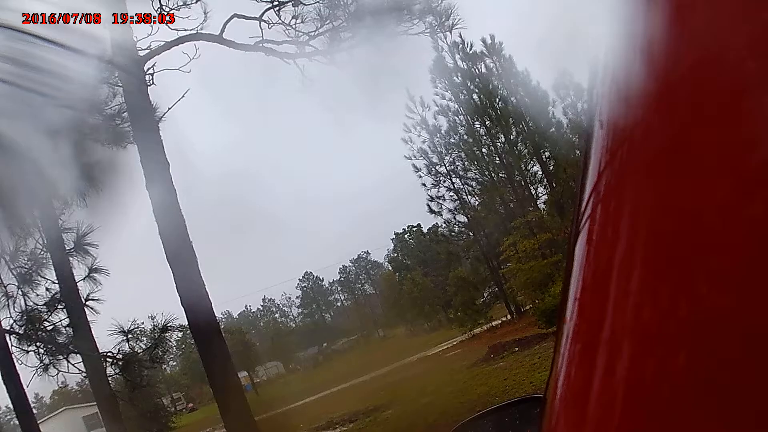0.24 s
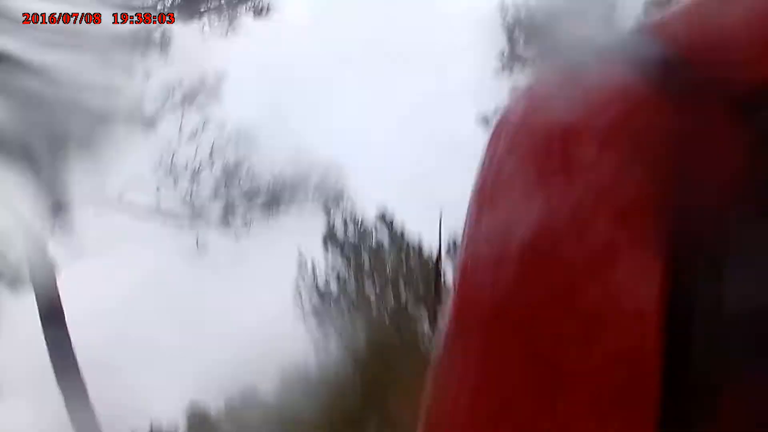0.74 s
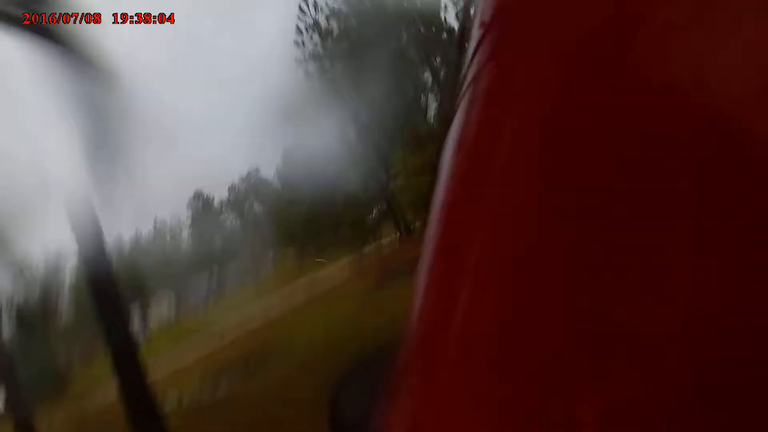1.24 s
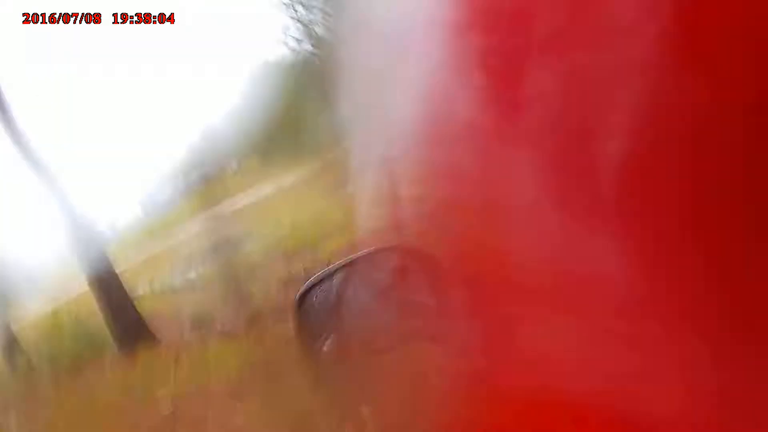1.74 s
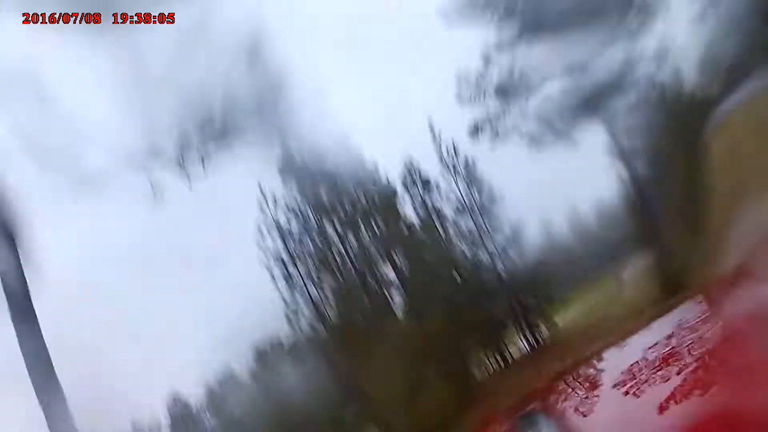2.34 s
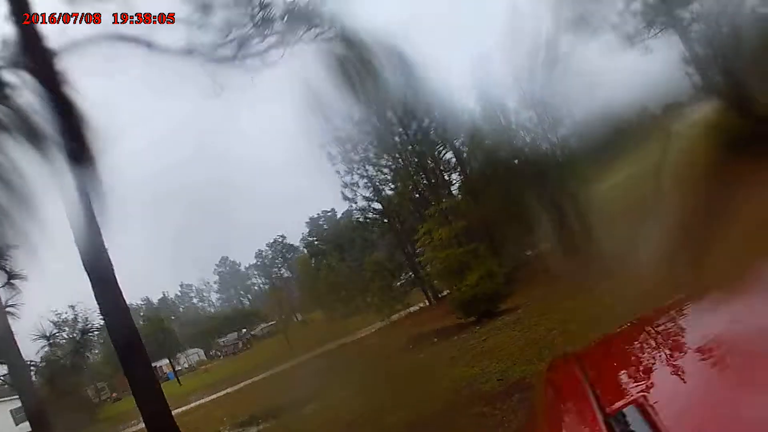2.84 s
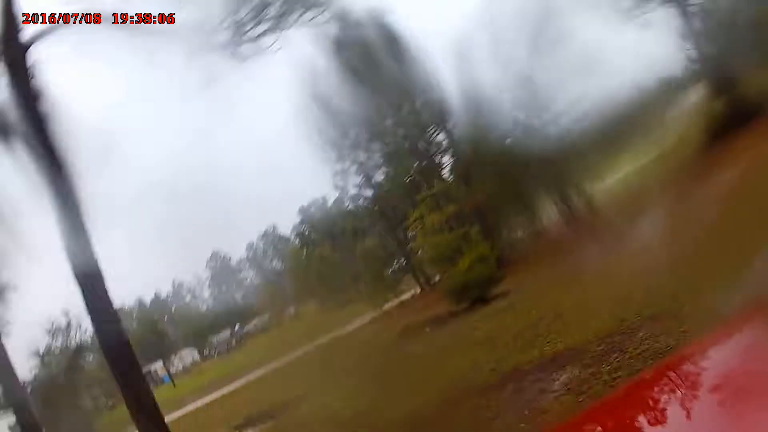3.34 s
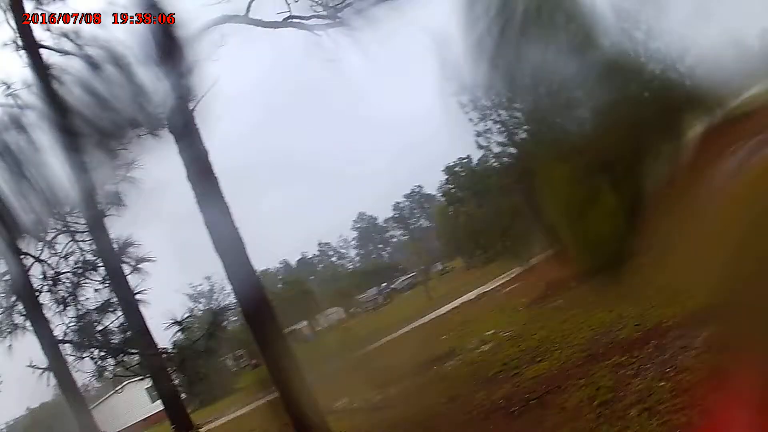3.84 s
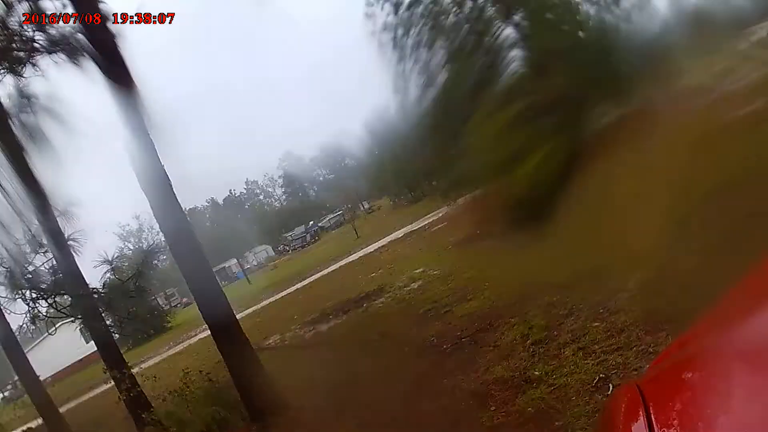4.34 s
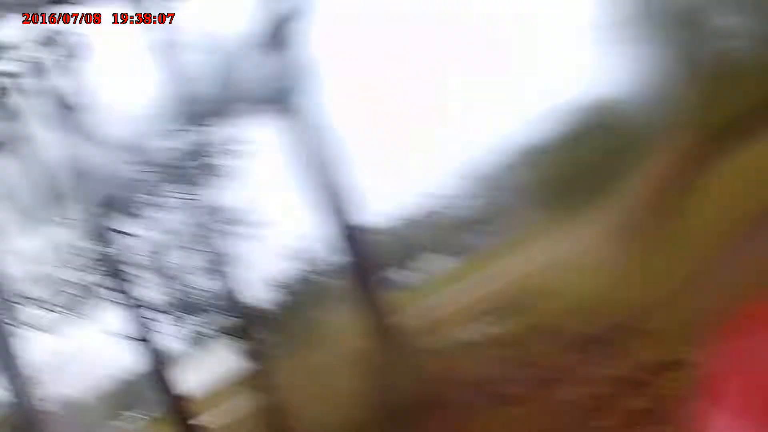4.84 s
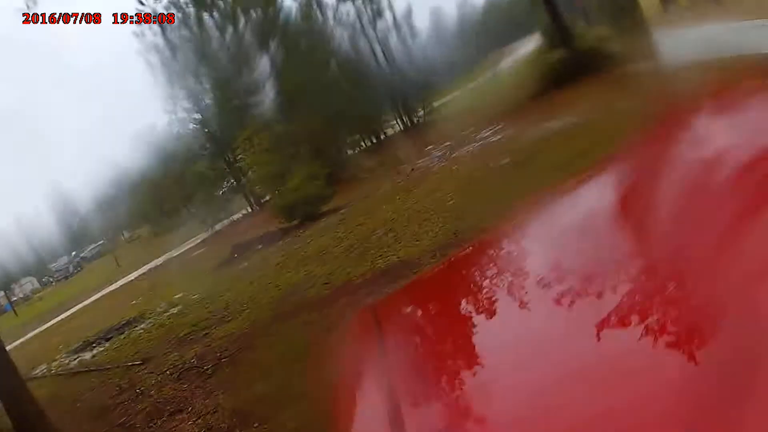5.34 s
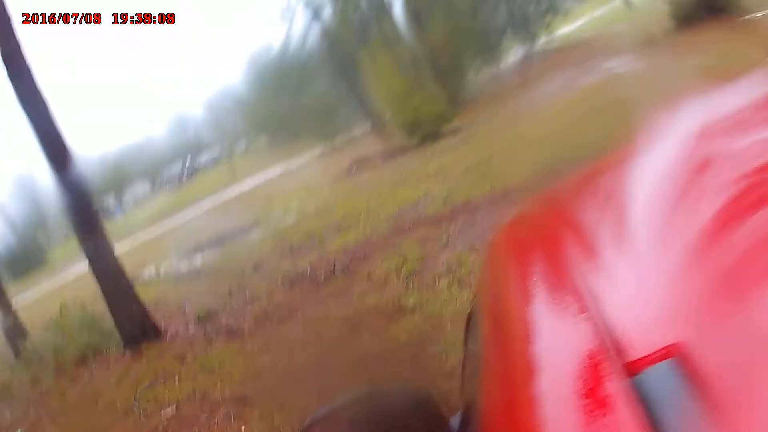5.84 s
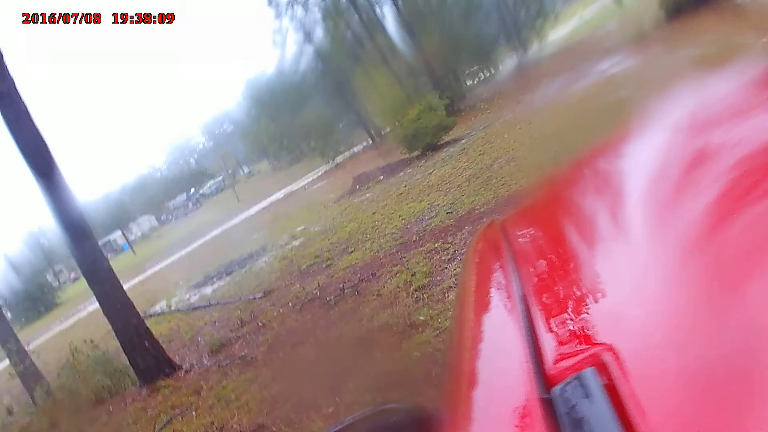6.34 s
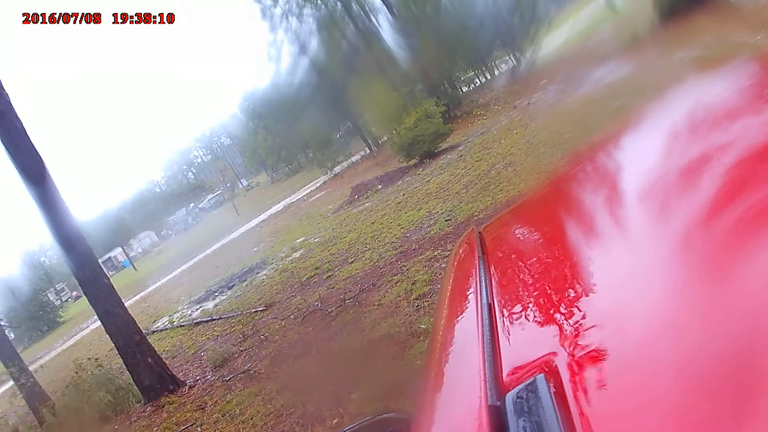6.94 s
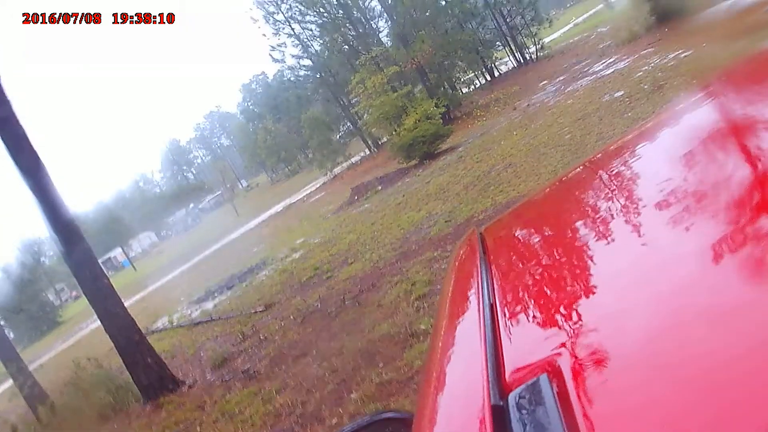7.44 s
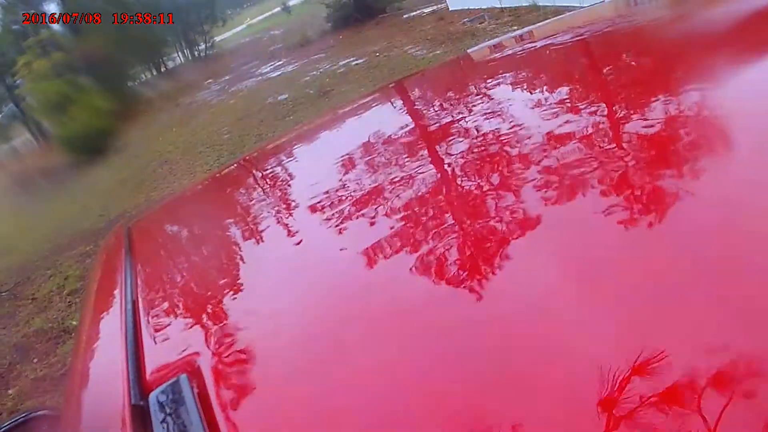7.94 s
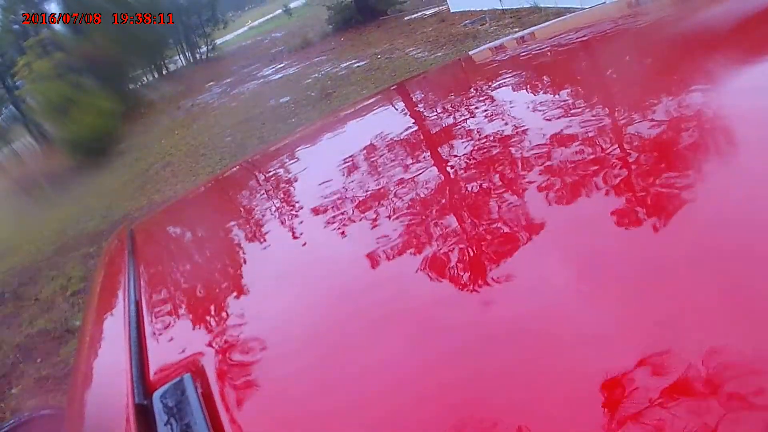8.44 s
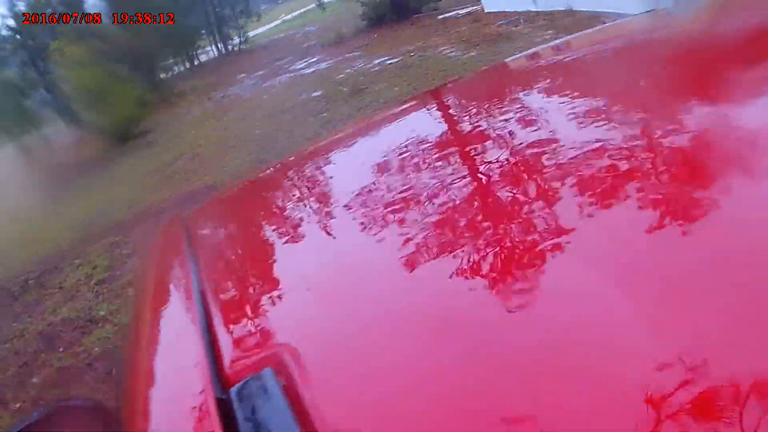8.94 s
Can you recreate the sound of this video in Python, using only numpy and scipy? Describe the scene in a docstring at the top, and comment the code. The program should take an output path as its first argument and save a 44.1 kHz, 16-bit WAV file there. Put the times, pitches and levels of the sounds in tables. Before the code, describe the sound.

Storm wind and spray batter a small cased microphone beside a pickup, with honking buffets, hard knocks and crackle, then a hollow sheltered hum with drops.

```python
"""Beside a pickup truck in a hurricane, wind and rain beat on a small cased camera.
Gusts and spray are fluttering noise shaped into a rush; buffets honk through the case near 1.4 kHz.
Drops tick as short resonances, and knocks and jolts add scraping, crackle, thumps and a ringing mount.
Later the truck shelters the camera: a hollow hum under a light patter. Microphone hiss lies under it
all; the loudest peaks overload."""
import sys
import numpy as np
from scipy import signal
from scipy.fft import rfft, irfft
from scipy.io import wavfile
from scipy.ndimage import uniform_filter1d

SR = 44100
rng = np.random.default_rng(int(sys.argv[2]) if len(sys.argv) > 2 else 0)


def master(y):
    """Save y as 16-bit WAV."""
    cut = np.clip(np.atleast_2d(y).T, -1, 1)
    pcm = np.round(cut * 32767)  # scale
    wavfile.write(sys.argv[1], SR, pcm.astype(np.int16))


N = 404838
TIME = np.arange(N) / SR

# drops and debris hitting the case: t/s, peak/dB, f/Hz, treble re middle before trim/dB
TICKS = [(0.162, -28.5, 1640, -14), (0.229, -25, 1660, -6), (0.615, -28, 1590, -11),
         (0.729, -20.5, 1360, -15.5), (1.625, -36, 1370, -42), (2.355, -21, 1380, -24),
         (2.476, -15.5, 1310, -25), (3.345, -14.5, 1410, -21), (3.986, -21, 1380, -23.5),
         (4.031, -25.5, 1430, -38), (4.143, -21, 1380, -5), (4.251, -12.5, 1393, -20),
         (4.36, -24, 1290, -13), (4.63, -29, 1380, -20), (4.594, -27.5, 1340, -29),
         (4.733, -29.5, 1380, -17), (4.807, -13.5, 1360, -48), (5.137, -1.5, 1346, -31.5),
         (5.321, -22, 1210, -26), (5.455, -21.5, 1420, -28), (5.545, -13.5, 1400, -45),
         (5.681, -25.5, 1410, -25), (5.78, -25.5, 1540, -31), (5.988, -18, 1354, -27.5),
         (6.155, -3.5, 1310, -42), (6.447, -23, 1600, -43), (6.632, -20, 1540, -42),
         (6.938, -24, 1300, -33), (7.153, -11.5, 1330, -16.5), (7.262, -22, 1500, -29),
         (7.51, -20.5, 1400, -18), (7.533, -19.5, 1380, -19), (7.685, -7, 1466, -24.5),
         (7.815, -21.5, 1306, -32), (7.901, -6, 1307, -13), (7.932, -18.5, 1380, -17),
         (7.959, -22, 1390, -19), (8.444, -23.5, 1390, -18)]
# camera bumps and chatters, levels before trims: t/s, contact/s, level/dB, thud/dB,
# treble re level/dB, mount ring/dB
KNOCKS = [(0.771, 0.0064, -19, -47, -25, -68), (0.818, 0.0023, -6.5, -38.5, -19.5, -65),
          (0.849, 0.016, -12, -25, -16, -31.5), (0.984, 0.0056, -11.5, -30, -24.5, -106),
          (1.139, 0.011, -9.5, -35.5, -36, -41), (1.363, 0.0043, -12, -50, -37, -50),
          (1.692, 0.021, -13, -18.5, -11, -53), (1.718, 0.027, -10, -21, -16, -59),
          (1.77, 0.0076, -4.5, -19, -23, -75), (1.784, 0.0044, -10.5, -27, -20, -67),
          (1.944, 0.013, -7, -21.5, -26, -49), (2.117, 0.0094, -4.5, -22, -38, -34.5),
          (2.211, 0.01, -10, -20.5, -16.5, -33), (2.269, 0.011, -13, -19, -10.5, -56),
          (2.407, 0.011, -10, -25.5, -17, -34.5), (2.501, 0.0049, -24.5, -34.5, -15.5, -72),
          (2.721, 0.0031, -13, -31, -37, -47.5), (3.149, 0.006, -5, -20.5, -22, -34.5),
          (3.706, 0.0084, -28.5, -64, -21, -40), (4.946, 0.012, -26, -67, -22, -90),
          (5.004, 0.011, -20.5, -59, -27, -65), (6.238, 0.0075, -25.5, -68, -32, -59)]
# steady wind in the lee of the truck: t/s, level before trim/dB
LEE = [(6.2, -42), (6.33, -45), (6.48, -40.5), (6.59, -40.5), (6.91, -45.5), (7.54, -41), (7.72, -44),
       (7.93, -43), (8.48, -46), (9.18, -42)]
# spectrum of wind and spray: f/Hz, level/dB
RUSH_COLOUR = [(210, -64.5), (350, -36), (564, -24), (834, -11.5), (1010, -12), (1500, 0), (2140, -7.5),
               (2410, -15.5), (2730, -14), (3050, -23.5), (3280, -19), (3660, -31), (4500, -28),
               (6110, -55), (6500, -51.5), (8450, -105), (14300, -120)]
# spectrum of rumbles and thuds: f/Hz, level/dB
RUMBLE_COLOUR = [(15, -6.5), (50, -3), (130, -3), (350, -4), (600, -4), (1200, -1), (3000, -53.5)]
# spectrum of snaps and patter: f/Hz, level/dB
SNAP_COLOUR = [(100, -24), (600, -23.5), (1500, -5), (2200, 10), (2700, 2.5), (3500, -4.5), (4500, -10),
               (5300, -22), (6200, -38.5), (9000, -29)]
# spectrum of crackle and sizzle: f/Hz, level/dB
CRACKLE_COLOUR = [(2000, -3.5), (4500, -9.5), (6000, -27), (7200, -19.5), (8000, -33.5), (9000, -16),
                  (11500, -4), (17000, -10.5)]

# shared by gusts and lee eddies
GUST_RISE_DB_PER_S, GUST_FALL_DB_PER_S, GUST_ARCH_DB = 796.5, 492.5, 3.5


def from_db(db):
    """Decibels to gain."""
    return 10 ** (np.asarray(db) / 20)


def rms_one(x):
    """Scale to rms 1."""
    return x / np.sqrt(np.mean(x ** 2) + 1e-20)


def peak_one(x):
    """Scale to a peak of 1."""
    return x / np.abs(x).max()


def add(out, s, sound):
    """Mix a sound in at time s."""
    start = max(round(s * SR), 0)
    out[start:start + len(sound)] += sound[:N - start]


def drift(rate_hz):
    """Slow random wander of rms 1: noise through two equal poles at rate_hz."""
    step, settle = 20, 2000  # samples per slow point, slow points discarded
    r = np.exp(-2 * np.pi * rate_hz * step / SR)
    noise = rng.standard_normal(N // step + settle + 2)
    slow = signal.lfilter([1], [1, -2 * r, r * r], noise)[settle:]
    return np.interp(np.arange(N) / step, np.arange(len(slow)), rms_one(slow))


def colour(x, spectrum, size=2048):
    """Causal (minimum-phase) filter with the given spectrum; white noise keeps its power."""
    hz, db = np.transpose(spectrum)
    grid_hz = np.maximum(np.arange(size // 2 + 1) * SR / size, 1)
    level_db = np.interp(np.log(grid_hz), np.log(hz), db)
    cepstrum = irfft(np.log(from_db(level_db)))
    # fold onto the causal half
    cepstrum[1:size // 2] *= 2
    cepstrum[size // 2 + 1:] = 0
    response = irfft(np.exp(rfft(cepstrum)))
    return signal.oaconvolve(x, response / np.linalg.norm(response))[:len(x)]


def treble(x, edge_hz=3500):
    """The hissing top of a sound, by zero-phase high-pass."""
    return signal.sosfiltfilt(signal.butter(4, edge_hz, "high", fs=SR, output="sos"), x)


def ring(x, hz, t60_s):
    """Two-pole resonator: a unit click sets a sine of height 1 ringing."""
    r, w = from_db(-60 / (t60_s * SR)), 2 * np.pi * hz / SR
    return signal.lfilter([0, np.sin(w)], [1, -2 * r * np.cos(w), r * r], x + 1e-18)


def mount(kicks):
    """Kicks set the modes of the springy camera mount ringing."""
    # modes: f/Hz, level/dB, t60/s
    modes = [(228.7, -1, 0.53), (240, -18, 0.18), (312, -8.5, 0.055)]
    return sum(from_db(db) * ring(kicks, hz, t60_s) for hz, db, t60_s in modes)


def blast(s, length_s, rise_db_per_s, fall_db_per_s, arch_db):
    """Gain of one blast of air: quick rise, arched hold, quick fall and a weak lingering wake."""
    wake_db, wake_fall_db_per_s = -16, 138
    early_s = np.maximum(s - TIME, 0)
    late_s = np.maximum(TIME - s - length_s, 0)
    arch = arch_db * np.clip(2 * (TIME - s) / length_s - 1, -1, 1) ** 2
    fall = np.maximum(-fall_db_per_s * late_s, wake_db - wake_fall_db_per_s * late_s)
    return from_db(np.maximum(fall - arch - rise_db_per_s * early_s, -150))


def spray(per_s, spread_db, drops_db, flutter_db, flutter_hz):
    """Turbulent air that flutters, with fine drops of uneven size in it; rms 1."""
    sizes = from_db(spread_db * np.minimum(rng.exponential(1, N), 4)) * rng.choice([-1, 1], N)
    drops = rms_one(sizes * (rng.random(N) < per_s / SR))
    air = rng.standard_normal(N)
    return rms_one((air + from_db(drops_db) * drops) * from_db(flutter_db * drift(flutter_hz)))


def sheltered(fade_s=0.038):
    """0 in the open, 1 once the camera is in the lee of the truck."""
    return np.clip((TIME - LEE[0][0]) / fade_s + 1, 0, 1)


def rush(open_wind_db=-49, rumble_trim_db=3.5, mount_db=-37, open_rumble_db=-28):
    """Sheets of wind and spray: a broad roar with rumble below it; the mount hums along."""
    # gusts: t/s, length/s, level/dB, treble lift/dB, rumble re level before trim/dB
    gusts = [(2.421, 0.098, -33, -7, -17), (2.623, 0.036, -35.5, -6, -15.5), (2.704, 0.42, -23, 4, -31.5),
             (3.05, 0.048, -20, 3, -32), (3.16, .14, -19, 0, -38), (3.405, 0.18, -18.5, 3, -38),
             (3.592, 0.11, -25, 2, -37), (3.681, .10, -17.5, 2.5, -40), (3.79, 0.099, -28.5, 2, -28.5),
             (4.03, 0.074, -42, -5, -23), (4.354, 0.058, -38, -4, -21.5), (4.793, 0.13, -30, -14, -26),
             (5.182, 0.26, -39, 3, -22.5), (5.463, 0.057, -24, 3.5, -27), (5.543, 0.069, -33, 1, -28),
             (5.977, 0.02, -33.5, -10, -17), (6.095, 0.023, -31.5, -1, -19)]
    force = from_db(open_wind_db) * (1 - sheltered())
    treble_boost, shaking = 0, from_db(open_rumble_db) * force
    for s, length_s, level_db, lift_db, low_db in gusts:
        shape = blast(s, length_s, GUST_RISE_DB_PER_S, GUST_FALL_DB_PER_S, GUST_ARCH_DB)
        gust = from_db(level_db) * shape
        treble_boost = np.where(gust > force, from_db(lift_db) - 1, treble_boost)
        force = np.hypot(force, gust)
        shaking = np.hypot(shaking, from_db(low_db) * gust)
    flow = force * spray(per_s=350, spread_db=3.0, drops_db=-4, flutter_db=2.0, flutter_hz=23)
    roar = colour(flow, RUSH_COLOUR)
    roar = roar + uniform_filter1d(treble_boost, size=512) * treble(roar)
    rumble = colour(shaking * rng.standard_normal(N), RUMBLE_COLOUR)
    hum = rms_one(mount(flow)) * flow.std()
    return roar + from_db(rumble_trim_db) * rumble + from_db(mount_db) * hum


def drizzle(per_s=8.7, level_db=-34.5, spread_db=4, snap_db=-6.0, ring_db=-6.5, cavity_hz=1380, t60_s=.014):
    """Faint drops tap the case at random: each is a brief snap and a ring of the cavity."""
    sizes = from_db(level_db + spread_db * rng.uniform(-1, 1, N))
    taps = (rng.random(N) < per_s / SR) * sizes
    push = np.diff(taps, prepend=0) * SR / (2 * np.pi * cavity_hz)
    cavity = ring(push, cavity_hz, t60_s)
    return from_db(ring_db) * cavity + from_db(snap_db) * colour(taps, SNAP_COLOUR)


def splashes(trim_db=-3.5, bright_db=-4.5, rise_s=0.0011, size=12000):
    """Handfuls of spray slap the case within milliseconds and drain away: enveloped spray noise."""
    # slaps: t/s, level before trim/dB, decay/s
    slaps = [(0.041, -30, 0.05), (0.23, -24, 0.027), (0.293, -26.5, 0.026), (0.516, -25, 0.048),
             (0.567, -25.5, 0.0091), (0.631, -31.5, 0.036), (4.841, -14, 0.0054), (5.454, -22.5, 0.029),
             (6.514, -28, 0.011), (6.632, -26.5, 0.013), (6.934, -18.5, 0.011), (7.361, -27, 0.016)]
    wet, t = np.zeros(N), np.arange(size) / SR
    for s, level_db, decay_s in slaps:
        add(wet, s, from_db(level_db + trim_db) * (1 - np.exp(-t / rise_s)) * np.exp(-t / decay_s))
    flow = wet * spray(per_s=900, spread_db=3, drops_db=-4, flutter_db=1.5, flutter_hz=80)
    return colour(flow, RUSH_COLOUR) + from_db(bright_db) * colour(flow, SNAP_COLOUR)


def ticks(snap_trim_db=16.5, splash_s=0.002, thud_db=-29, size=4096):
    """A hit swells into the cavity resonance; its splash adds a short snap, its push a slight thud."""
    out, t = np.zeros(N), np.arange(size) / SR
    swell_t60_s, case_t60_s = .003, .019
    click = 1.0 * (t == 0)
    thud = colour(click, RUMBLE_COLOUR)
    for s, peak_db, hz, treble_db in TICKS:
        cavity = ring(click, hz, case_t60_s)
        honk = ring(np.diff(cavity, prepend=0), hz, swell_t60_s)
        snap = colour(rng.standard_normal(size) * np.exp(-t / splash_s), SNAP_COLOUR)
        hit = peak_one(honk) + from_db(treble_db + snap_trim_db) * peak_one(snap)
        hit = hit + from_db(thud_db) * peak_one(thud)
        add(out, s, from_db(peak_db) * peak_one(hit))
    return out


def all_jolts():
    """Jolts from wind, knocks and drops, before trims: rows of (t/s, crackle/dB, thump/dB)."""
    # the wind alone jolts the camera inside its case: t/s, crackle peak/dB, thump/dB
    wind_jolts = [(0.5895, -38.5, -43.5), (0.875, -22, -35), (1.1115, -23.5, -35.5), (1.2622, -29.5, -43),
                  (1.3499, -27.5, -39), (1.5314, -31.5, -43.5), (1.7406, -13.5, -36), (1.8203, -29, -31.5),
                  (2.177, -27, -36), (2.2397, -22, -33), (2.2992, -22.5, -32), (2.359, -17.5, -34),
                  (2.638, -26, -45), (2.9888, -29, -42.5), (3.1018, -25, -37), (3.1256, -22.5, -45),
                  (3.162, -20, -26.5), (3.2297, -17.5, -38.5), (3.3575, -24.5, -41), (3.512, -25, -36),
                  (3.636, -32, -46), (5.68, -25, -39), (5.8609, -34, -50), (5.9902, -37, -42)]
    # intercept in dB at 0 dB thud or peak; growth in dB per dB
    knock_crackle_db, knock_crackle_growth = 1.5, 0.67
    knock_thump_db, knock_thump_growth = -19.5, 0.54
    tick_crackle_db, tick_crackle_growth = -21.5, 1.52
    tick_thump_db = -50  # re drop peak
    knocked = [(s, knock_crackle_db + knock_crackle_growth * thud_db,
                knock_thump_db + knock_thump_growth * thud_db)
               for s, _, _, thud_db, _, _ in KNOCKS]
    ticked = [(s, tick_crackle_db + tick_crackle_growth * peak_db, peak_db + tick_thump_db)
              for s, peak_db, _, _ in TICKS]
    return wind_jolts + knocked + ticked


def jolts(crackle_trim_db=1.5, thump_trim_db=-1.5, mount_db=-19, size=6000):
    """Loose play in the case: a thin uneven crackle over a soft low thump, which nudges the mount."""
    thump_hz, thump_s, rattle_s, uneven_db = 88, 0.0096, 0.01, 11.0
    out, kicks, t = np.zeros(N), np.zeros(N), np.arange(size) / SR
    swell = np.sqrt(t) * np.exp(-(t / rattle_s) ** 2)
    for s, peak_db, low_db in all_jolts():
        # a new random level every 60 samples
        slips = from_db(uneven_db * np.repeat(rng.standard_normal(size), 60)[:size])
        crackle = colour(rng.standard_normal(size) * slips * swell, CRACKLE_COLOUR)
        hz = thump_hz * rng.uniform(0.67, 1.32)
        thump = t / thump_s * np.exp(1 - t / thump_s) * np.sin(2 * np.pi * hz * t)
        add(out, s, from_db(peak_db + crackle_trim_db) * peak_one(crackle)
            + from_db(low_db + thump_trim_db) * thump)
        add(kicks, s, from_db([low_db + mount_db]) * rng.choice([-1, 1]))
    return out + mount(kicks)


def buffets(rumble_db=-29):
    """Short lumpy blasts straight onto the case blow its cavity: fluttering noise with a honk."""
    # blasts: t/s, length/s, level/dB, treble lift/dB
    blasts = [(0.768, 0.024, -16, -1), (0.813, 0.068, -14.5, -0.5), (0.977, .048, -21, -2),
              (1.103, 0.051, -19, 1), (1.239, 0.18, -16, -0.5), (1.489, 0.01, -19.5, 0),
              (1.539, 0.011, -26, -2), (1.643, 0.026, -13.5, 0.5), (1.68, 0.11, -12, 1.5),
              (1.809, 0.047, -31, 2), (1.9, 0.14, -14, 5), (2.061, 0.13, -26.5, 9), (2.21, 0.032, -17.5, 1),
              (2.263, 0.037, -16.5, 1), (2.352, 0.017, -33, -4)]
    # honk spectrum: f/Hz, level/dB
    honk_colour = [(210, -67.5), (350, -45.5), (711, -14), (794, -9), (1040, -12.5), (1190, -3), (1360, 4),
                   (1690, -6.5), (1890, -12.5), (2220, -11), (2700, -16), (3050, -27), (4560, -31.5),
                   (5890, -53), (6500, -52), (8450, -101), (14300, -120)]
    rise_db_per_s, fall_db_per_s, arch_db = 1108, 805, 7.5
    force, treble_boost = np.zeros(N), 0
    for s, length_s, level_db, lift_db in blasts:
        buffet = from_db(level_db) * blast(s, length_s, rise_db_per_s, fall_db_per_s, arch_db)
        treble_boost = np.where(buffet > force, from_db(lift_db) - 1, treble_boost)
        force = np.hypot(force, buffet)
    flow = force * spray(per_s=500, spread_db=4.0, drops_db=-4.0, flutter_db=2.5, flutter_hz=230)
    honk = colour(flow, honk_colour)
    honk = honk + uniform_filter1d(treble_boost, size=512) * treble(honk)
    return honk + from_db(rumble_db) * colour(flow, RUMBLE_COLOUR)


def knocks(trim_db=1.0, thud_trim_db=2.5, snap_trim_db=8.0, mount_trim_db=1.5, impact=7.9, size=4096):
    """A hard impact, then milliseconds of scraping: the case honks, thuds and snaps; the mount rings on."""
    # honk spectrum: f/Hz, level/dB
    honk_colour = [(300, -61), (600, -17), (1000, -13.5), (1250, 0.5), (1380, 6), (1550, -5), (1800, -9.5),
                   (2100, -12.5), (2700, -27.5), (3200, -60.5)]
    out, kicks = np.zeros(N), np.zeros(N)
    for s, contact_s, level_db, low_db, treble_db, ring_db in KNOCKS:
        touching = np.arange(size) / SR < contact_s
        parts = ((honk_colour, level_db + trim_db),
                 (RUMBLE_COLOUR, low_db + thud_trim_db),
                 (SNAP_COLOUR, level_db + treble_db + snap_trim_db))
        for spectrum, db in parts:
            force = touching * rng.standard_normal(size)
            force[0] = impact  # re scraping rms
            # sqrt: the level is the rms over the contact
            add(out, s, from_db(db) * rms_one(colour(force, spectrum)) * np.sqrt(touching.mean()))
        add(kicks, s + contact_s, from_db([ring_db + mount_trim_db]))
    return out + mount(kicks)


def mount_clunks(trim_db=-1.0, judder_s=.005, t60_s=.012, size=16000):
    """The mount judders: decaying noise through two resonances makes a rough, dull clunk."""
    # clunks: t/s, peak before trim/dB, f/Hz
    clunks = [(4.936, -26, 640), (4.948, -31, 610), (5.004, -36, 560), (6.097, -28, 700), (6.124, -43, 640),
              (6.156, -30, 686)]
    out, t = np.zeros(N), np.arange(size) / SR
    for s, peak_db, hz in clunks:
        judder = np.diff(rng.standard_normal(size) * np.exp(-t / judder_s), prepend=0)
        clunk = ring(ring(judder, hz, t60_s), hz, t60_s / 2)
        add(out, s, from_db(peak_db + trim_db) * peak_one(clunk))
    return out


def metal_pings(size=16000):
    """A thin bit of metal pings: a decaying sine."""
    # pings: t/s, f/Hz, height/dB, t60/s
    pings = [(4.948, 2900, -42, .16), (6.945, 4520, -53, .22)]
    out, click = np.zeros(N), 1.0 * (np.arange(size) == 0)
    for s, hz, height_db, t60_s in pings:
        add(out, s, ring(from_db(height_db) * click, hz, t60_s))
    return out


def lee_wind(trim_db=2.5, patter_db=-14):
    """Sheltered, the case hums hollowly under a light patter of drops and swells with each eddy."""
    # eddies curling round into the lee: t/s, length/s, level before trim/dB
    eddies = [(6.214, 0.073, -34), (6.408, 0.068, -33.5), (6.635, 0.1, -38.5), (7.555, 0.12, -37.5)]
    # hum spectrum: f/Hz, level/dB
    hum_colour = [(240, -61), (400, -47.5), (543, -34.5), (637, -18), (746, -29.5), (817, -18), (1060, -14),
                  (1330, 3.5), (1890, -16.5), (2210, -15.5), (2870, -25.5), (3070, -47), (3330, -40),
                  (4470, -31), (6000, -73), (7800, -97), (13200, -120)]
    flow = spray(per_s=200, spread_db=-0.5, drops_db=-14.0, flutter_db=2.5, flutter_hz=41)
    drops = spray(per_s=40, spread_db=5.0, drops_db=4, flutter_db=0, flutter_hz=9.6)
    force = sheltered() * from_db(np.interp(TIME, *np.transpose(LEE)))
    for s, length_s, level_db in eddies:
        eddy = blast(s, length_s, GUST_RISE_DB_PER_S, GUST_FALL_DB_PER_S, GUST_ARCH_DB)
        force = np.hypot(force, from_db(level_db) * eddy)
    hum = from_db(trim_db) * colour(flow, hum_colour)
    patter = from_db(patter_db) * colour(drops, SNAP_COLOUR)
    return force * (hum + patter)


def wet_air(x, top_hz=5250, sizzle_db=-38):
    """The treble of the weather ends steeply; a faint sizzle that follows its loudness rides above."""
    loudness = np.sqrt(np.abs(uniform_filter1d(x ** 2, size=256)))
    sizzle = from_db(sizzle_db) * colour(loudness * rng.standard_normal(N), CRACKLE_COLOUR)
    return signal.sosfilt(signal.butter(12, top_hz, fs=SR, output="sos"), x) + sizzle


def microphone_hiss(level_db=-63):
    """Steady coloured noise of the microphone."""
    # hiss spectrum: f/Hz, level/dB
    hiss_colour = [(30, 7), (100, 10.5), (300, 4), (4000, -7), (6000, -29), (8500, -16.5), (9500, -6.5),
                   (12000, 0.5), (17000, 4)]
    return from_db(level_db) * colour(rng.standard_normal(N), hiss_colour)


def scene():
    """Weather, drops, knocks, jolts and small parts at one microphone, over its hiss."""
    weather = wet_air(rush() + drizzle() + splashes() + buffets() + lee_wind())
    handling = jolts() + knocks() + mount_clunks() + metal_pings()
    return (weather + ticks() + handling + microphone_hiss())[None]


def record(dry, cutoff_hz=17400):
    """The case colours all of it, the loudest peaks are squashed and the top is cut."""
    # peaks and hollows of the case and its sound port: f/Hz, width/Hz, gain/dB
    case_bands = [(950, 280, -3.5), (1380, 210, 0), (1884, 180, -3.5), (2070, 350, 1.5), (3011, 116, -22.5),
                  (3760, 190, -2.5), (3990, 98, -7), (4430, 450, 2), (6000, 250, -6.5)]
    sound = dry
    for hz, width_hz, db in case_bands:
        swing, half, bend = from_db(db / 2), np.pi * width_hz / SR, -2 * np.cos(2 * np.pi * hz / SR)
        b = [1 + half * swing, bend, 1 - half * swing]
        a = [1 + half / swing, bend, 1 - half / swing]
        sound = signal.lfilter(b, a, sound)
    squashed = sound / (1 + sound ** 6) ** (1 / 6)
    return signal.sosfilt(signal.ellip(10, .2, 70, cutoff_hz, fs=SR, output="sos"), squashed)


dry = scene()
out = record(dry)
master(out)
```